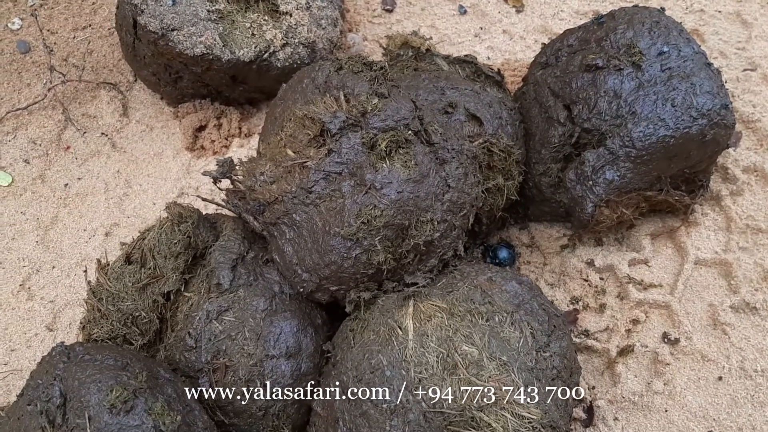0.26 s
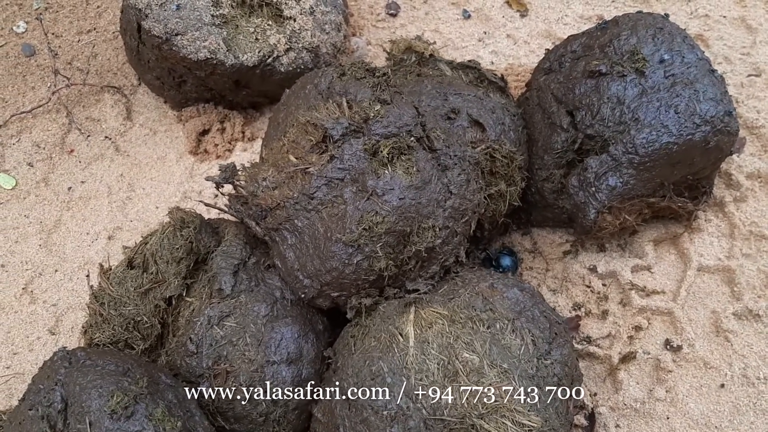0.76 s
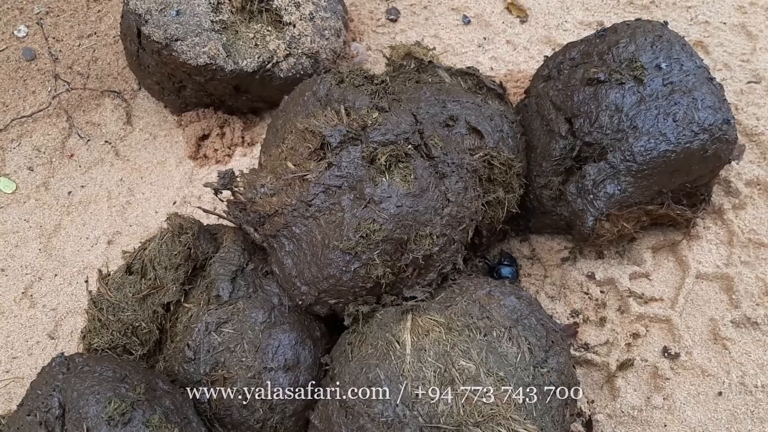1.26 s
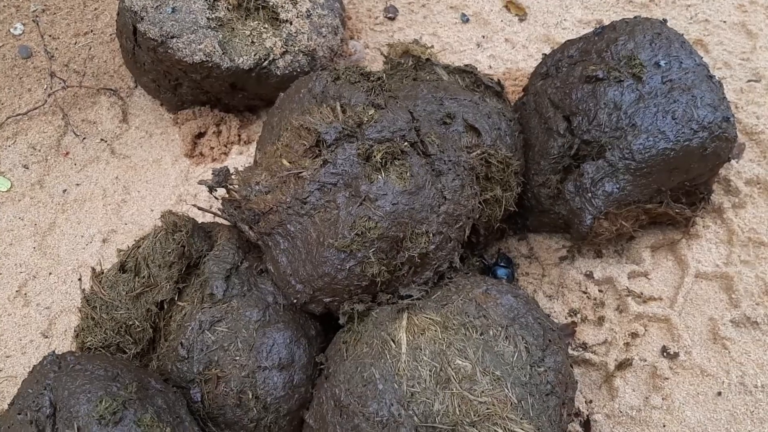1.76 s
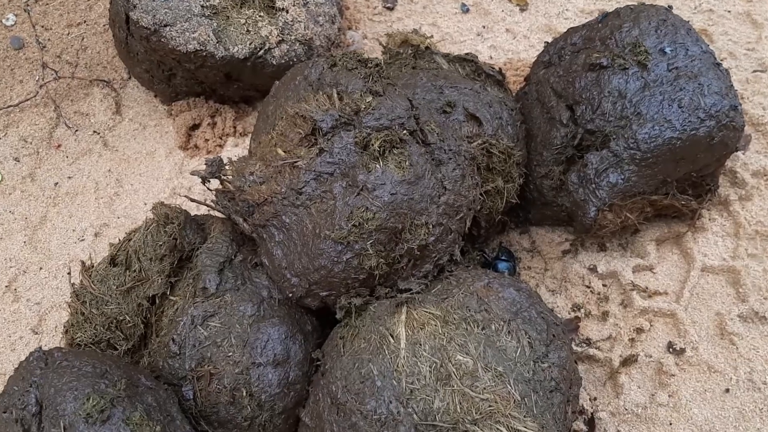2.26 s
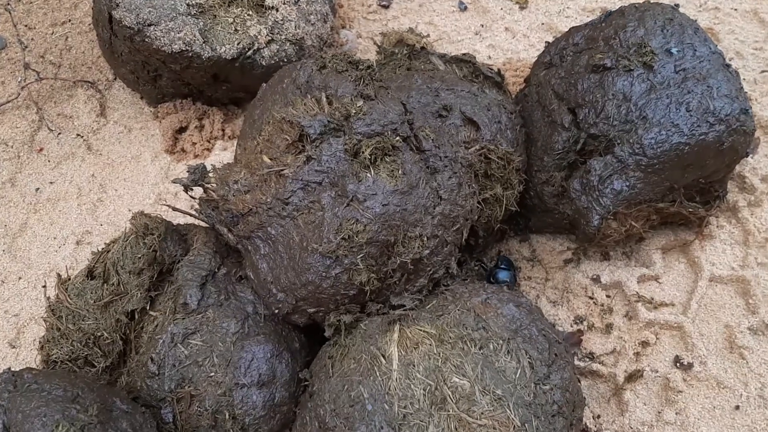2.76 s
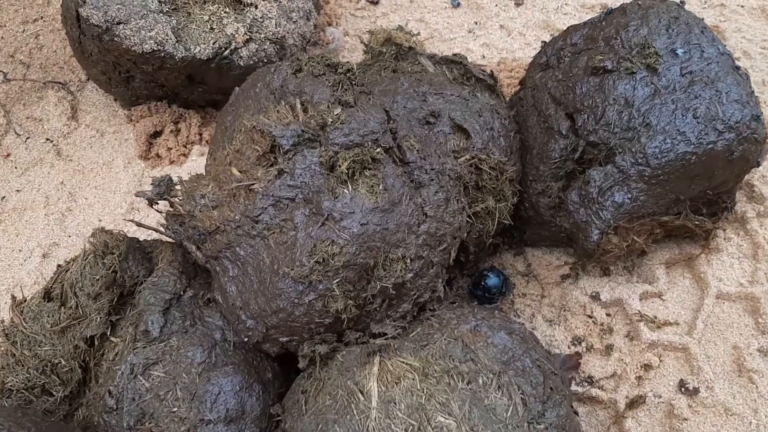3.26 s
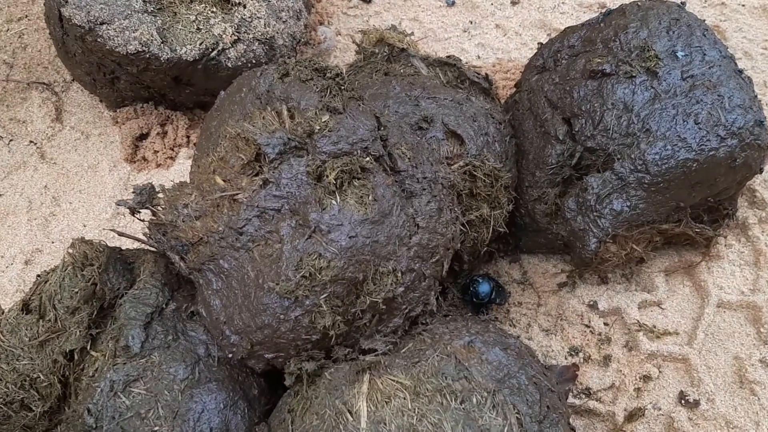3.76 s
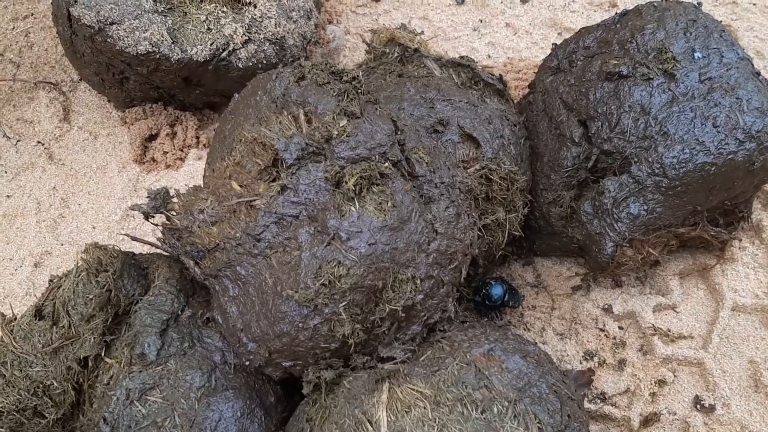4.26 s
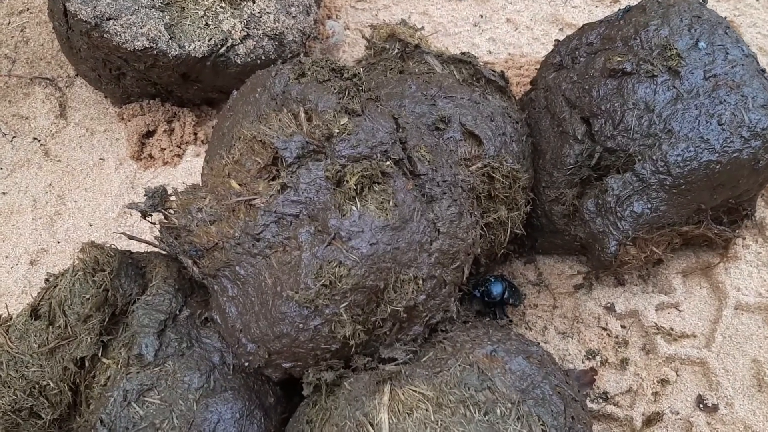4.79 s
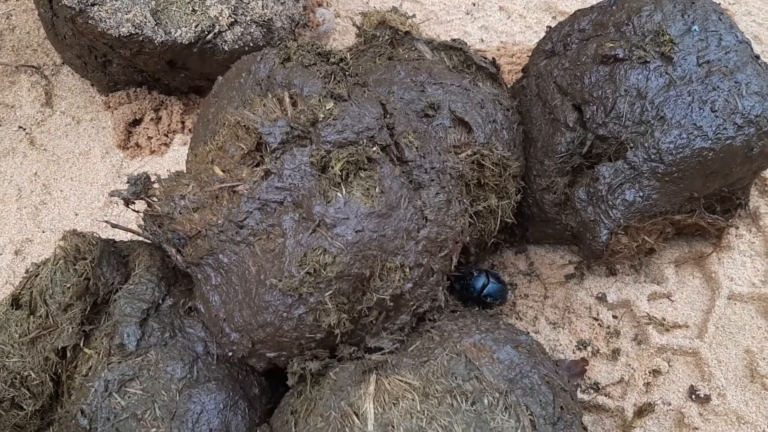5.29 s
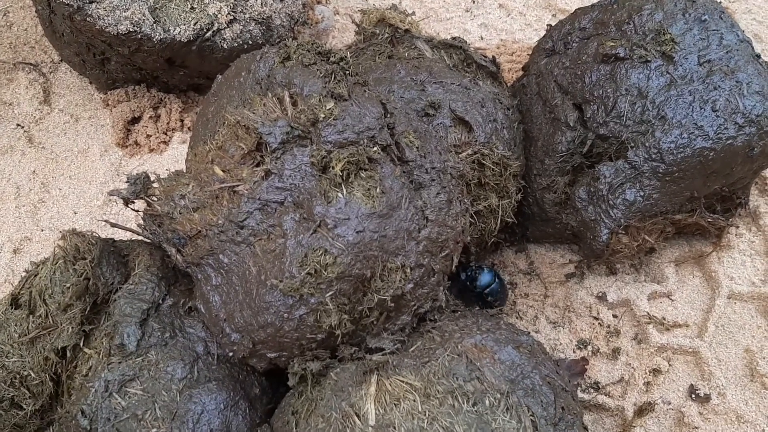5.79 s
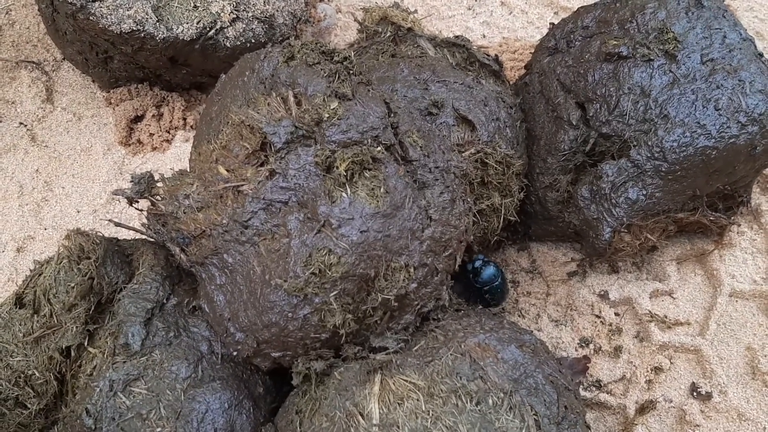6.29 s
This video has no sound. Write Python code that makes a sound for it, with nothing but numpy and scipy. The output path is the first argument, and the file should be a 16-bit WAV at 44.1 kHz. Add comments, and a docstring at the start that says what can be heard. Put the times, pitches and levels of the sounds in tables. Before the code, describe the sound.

A quiet open-air hush carries a high, shimmering insect chorus. Small birds exchange thin, echoing falling notes, with sharp ticks, quick zips and distant chirps mostly to the right. Gusts then rumble and buffet the microphone while a mewing cry sags in pitch. The wind drops away, leaving brighter whistles and a strong, close arched chirp near the end.

```python
"""Small birds in dry scrub, wind on the microphone

Two small birds deep in the bushes trade falling 'tsiu' notes over a steady band of insects. Others whistle,
tick, mew and chirp near and far: near-sine voices on drawn contours, scattered by echoes from twigs and trunks.
In the middle, gusts shake both ports of the microphone: shaped noise that throbs, rumbles, flutters and buffets.
A thin whistle wavers along with them, dry clicks snap, and a faint hush of open air lies behind it all."""
import sys
import numpy as np
from scipy import signal
from scipy.fft import rfft, irfft
from scipy.io import wavfile
from scipy.ndimage import map_coordinates

SR = 44100
rng = np.random.default_rng(int(sys.argv[2]) if len(sys.argv) > 2 else 0)


def wav_record(signal):
    """Record a signal, one row per channel, as 16-bit PCM in the file named by sys.argv[1]."""
    frames = np.transpose(np.atleast_2d(signal))
    bounded = np.clip(frames, -1, 1)
    # unit amplitude maps onto the largest positive 16-bit level
    quanta = np.round(bounded * 32767).astype(np.int16)
    wavfile.write(sys.argv[1], SR, quanta)


N = 288414
T = np.arange(N) / SR  # time, s
ALONG = np.linspace(0, 1, 65)  # share of a note's length
# Event levels are dB re full scale before the trims and panning; levels in spectra and note shapes are relative.


def undb(db):
    """Decibels to gain."""
    return 10 ** (np.asarray(db) / 20)


def unit(x):
    """Scale to rms 1."""
    return x / np.sqrt(np.mean(x ** 2))


def curves(rows, t):
    """Join the rows of a table by straight lines; the first column is time."""
    s, *columns = np.transpose(rows)
    return [np.interp(t, s, column) for column in columns]


def colour(x, points):
    """Weight the spectrum of a signal by (f/Hz, level/dB) points, joined over log frequency, at rms 1."""
    hz, db = np.transpose(points)
    f = np.maximum(np.arange(N // 2 + 1) * SR / N, 1)
    gain = undb(np.interp(np.log(f), np.log(hz), db))
    return unit(irfft(rfft(x) * gain, N))


def noise():
    """Independent white noise at the two ports."""
    return rng.standard_normal((2, N))


def walk(rate):
    """Random drift at rms 1: straight lines between `rate` chance values per second."""
    knots = rng.standard_normal(8192)
    return unit(map_coordinates(knots, [T * rate], order=1, mode="wrap"))


def pan(left_db):
    """Gains of the left and right port; left_db is the level of left over right."""
    return undb(np.array([[left_db], [-left_db]]) / 2)


def sing(notes, waver, flutter_db, second_db, third_db, nasal=0):
    """A syrinx: a near sine on each (t/s, f/Hz, level/dB) contour, with quaver and weak overtones.

    A slow second oscillation adds nasal sidebands."""
    out, quaver, flicker = np.zeros(N), walk(260), walk(110)
    for rows in notes:
        start, end = rows[0][0], rows[-1][0]
        at = slice(max(int(start * SR), 0), int(end * SR))
        hz, db = curves(rows, T[at])
        phase = 2 * np.pi * np.cumsum(hz * (1 + waver * quaver[at])) / SR
        tone = np.sin(phase) + undb(second_db) * np.sin(2 * phase)
        tone += undb(third_db) * np.sin(3 * phase) * (3 * hz < SR / 2)  # no aliasing
        beat = .094 * phase
        sidebands = np.sin(phase - beat) + 0.19 * np.sin(phase + beat) + 0.13 * np.sin(phase - 2 * beat)
        tone += nasal * sidebands
        edge = np.clip(np.minimum(T[at] - start, end - T[at]) / 0.003, 0, 1)  # 3 ms ramps against clicks
        level = undb(db + flutter_db * flicker[at])
        out[at] += np.sqrt(2) * edge * level * tone
    return out


def repeats(shape, events):
    """Contours of one note shape sung at each (t/s, level/dB, f/Hz)."""
    return [np.array(shape) * [1, hz, 1] + [s, 0, db] for s, db, hz in events]


def envelope(t, length, attack, release):
    """Level of a note in dB: it rises from -18, holds at 0 and sinks back to -18."""
    return -18 * (np.clip(1 - t / attack, 0, 1) + np.clip(1 - (length - t) / release, 0, 1))


def scrub(x, wet_db, t60, left_db):
    """Direct sound plus many small echoes from twigs and trunks, different at each port."""
    t = T[:SR]
    echoes = rng.standard_normal((2, SR)) * (rng.random((2, SR)) < .03) * (t > .002)
    echoes *= undb(-60 * t / t60) + undb(-16.5 - 60 * t / 0.56)  # near bushes, then a weaker long tail
    response = undb(wet_db) * echoes / np.sqrt(np.sum(echoes ** 2, axis=1, keepdims=True))
    response[0, 1] = response[1, 0] = 1  # the direct sound reaches the right port first
    heard = signal.fftconvolve(x[None], response, axes=1)[:, :N]
    return heard * pan(left_db) / np.sqrt(1 + undb(2 * wet_db))


# spectrum of the open air: f/Hz, level/dB
AIR_SPECTRUM = [(25, -10), (80, 2), (220, 4.5), (400, -8), (900, -17), (1800, -13.5), (2450, -5),
                (3300, -12), (6500, -15), (8500, -40.5), (11000, -15.5), (15500, -15)]


def air():
    """Faint open-air hush: shaped noise, separate at each port, whose level drifts slightly."""
    return colour(noise(), AIR_SPECTRUM) * undb(-70.0 + 0.6 * walk(4.0)) * pan(-5.0)


# spectrum of the merged insect buzz: f/Hz, level/dB
INSECT_SPECTRUM = [(3600, -31.5), (4200, -14.5), (4700, -2.5), (5200, 2), (5650, 3.5), (6100, -8.5),
                   (6800, -20.5), (7500, -67)]
# swells of the chorus: t/s at the crest, level/dB
INSECT_SWELLS = [(.3, -56.5), (.99, -54.5), (1.62, -56.5), (2.52, -54.5), (2.92, -57), (3.62, -53.5),
                 (4.55, -56.5), (5.34, -56.5), (6.2, -54)]
SWELL_S, INSECT_LULL_DB = .21, -62  # spread of a swell; level between swells


def insects():
    """Countless buzzes merge into one shimmering noise band that swells and ebbs; one thin trill stands out."""
    power = undb(INSECT_LULL_DB) ** 2
    for crest, db in INSECT_SWELLS:
        swell = undb(db) * np.exp(-.5 * ((T - crest) / SWELL_S) ** 2)
        power = power + swell ** 2
    band = colour(noise(), INSECT_SPECTRUM) * np.sqrt(power) * undb(1.5 * walk(45))
    trill_hz = 5170 + 30 * walk(120)
    trill = undb(-71.5 + 2.5 * walk(6.8)) * np.sin(2 * np.pi * np.cumsum(trill_hz) / SR)
    return (band + trill) * pan(-6.5)


def puff(start, length, attack, fall_db_per_s):
    """Strength of one puff: it builds, holds and dies away."""
    build = np.clip((T - start) / attack, 0, 1)
    return build * undb(-fall_db_per_s * np.maximum(T - start - length, 0))


# puffs of wind on the microphone: t/s, length/s, throb level/dB, rumble level/dB, flutter level/dB
GUSTS = [(0.213, 0.096, -65, -71, -87), (0.851, 0.043, -67, -62, -81), (1.09, 0.078, -63.5, -56, -86),
         (1.999, 0.36, -54, -51.5, -67), (2.274, 0.098, -49.5, -49.5, -52),
         (2.406, 0.052, -49.5, -49.5, -59.5), (2.606, 0.096, -51.5, -51, -61.5),
         (2.82, 0.16, -49.5, -45.5, -47.5), (2.995, .16, -46.5, -46, -54), (3.175, 0.096, -49, -42.5, -49),
         (3.322, 0.13, -50, -46.5, -52.5), (3.575, 0.085, -50, -46, -53), (3.974, 0.048, -55.5, -47, -64),
         (5.821, 0.15, -68.5, -56, -76)]
GUST_ATTACK_S, GUST_FALL_DB_PER_S = 0.0089, 329
THROB_ATTACK_S, THROB_FALL_DB_PER_S, THROB_HANG_S = 0.044, 71, 0.065


def gust_strengths():
    """Strength of large, small and torn eddies; the large ones build slowly, linger and die slowly."""
    large, small, torn = np.zeros((3, N))
    for start, length, throb_db, rumble_db, flutter_db in GUSTS:
        quick = puff(start, length, GUST_ATTACK_S, GUST_FALL_DB_PER_S)
        slow = puff(start, length + THROB_HANG_S, THROB_ATTACK_S, THROB_FALL_DB_PER_S)
        large = np.maximum(large, undb(throb_db) * slow)
        small = np.maximum(small, undb(rumble_db) * quick)
        torn = np.maximum(torn, undb(flutter_db) * quick)
    return large, small, torn


def ports(apart):
    """Noise shared by both ports plus a share of its own at each."""
    return rng.standard_normal(N) + apart * noise()


def lee(x):
    """The left port is sheltered from the finest eddies: above about 1 kHz the right is struck harder."""
    fine = signal.sosfilt(signal.butter(1, 1000, "high", fs=SR, output="sos"), x)
    return x + fine * (pan(-7.5) - 1)


# spectra of large, smaller and torn eddies on the microphone: f/Hz, level/dB
THROB_SPECTRUM = [(20, -25), (38, -3.5), (52, -4), (68, 3.5), (90, -4), (130, -21), (250, -86.5)]
RUMBLE_SPECTRUM = [(50, -42), (90, -6.5), (120, -0.5), (175, -3), (230, -10.5), (320, -20), (480, -24),
                   (900, -69)]
FLUTTER_SPECTRUM = [(150, -17), (300, -13.5), (430, 3), (580, 1), (750, -7.5), (1500, -11), (3000, -15),
                    (6000, -32), (9000, -39.5), (15000, -30)]
# sharp buffets: t/s, level/dB
BUFFETS = [(1.083, -60.5), (2.314, -53), (2.831, -39), (2.927, -41), (3.185, -45.5), (3.22, -45),
           (3.254, -44.5), (3.32, -39), (3.368, -37.5), (3.407, -40), (3.625, -41.5), (3.972, -48),
           (5.733, -58)]
BREEZE_DB, WAKE_DB = -74.5, -27.5  # wind between the puffs; flutter in the wake of large eddies, re their throb


def wind():
    """Eddies shake both ports: large ones throb, smaller rumble, the strongest flutter and buffet; hiss rides along."""
    large, small, torn = gust_strengths()
    breeze = undb(BREEZE_DB + 1.5 * walk(6.5))
    throb = colour(ports(0.1), THROB_SPECTRUM) * np.hypot(large, undb(0.5) * breeze)
    rumble = colour(ports(0.23), RUMBLE_SPECTRUM) * np.hypot(small, breeze)
    rumble *= undb(-1.5 + 1.395 * walk(35))
    flutter = colour(ports(0.52), FLUTTER_SPECTRUM) * np.hypot(torn, undb(WAKE_DB) * large)
    flutter *= undb(-4.5 + 2.75 * walk(120))
    hiss = colour(noise(), [(6000, -18), (9000, -4), (11000, 11), (15500, 8)])
    hiss *= large * undb(-25 + 1.8 * walk(150))
    bursts = sum(undb(db) * (T >= s) * np.exp(-np.abs(T - s) / 0.011) for s, db in BUFFETS)
    buffet_spectrum = [(100, 5.0), (500, 0), (1500, -2.0), (4000, -6.5), (9000, -28), (15000, -33)]
    buffets = colour(ports(0.99), buffet_spectrum) * bursts * undb(-5)
    return (throb + rumble + lee(flutter + buffets) + hiss) * pan(-2.7)


# one long wavering contour: t/s, f/Hz, level/dB
THIN_WHISTLE = [(1.6, 2210, -74), (1.71, 2350, -71), (1.77, 2254, -80), (2.12, 2320, -66.5),
                (2.37, 2253, -68), (2.4, 2281, -62), (2.94, 2360, -60.5), (2.97, 2396, -63),
                (3.0, 2350, -56), (3.15, 2308, -66.5), (3.47, 2266, -55), (3.64, 2259, -52),
                (3.71, 2300, -68), (4.35, 2276, -79)]


def thin_whistle():
    """A long, nearly pure tone, far to the right, that wavers and swells during the gusts."""
    tone = sing([THIN_WHISTLE], waver=0.0039, flutter_db=2.0, second_db=-43, third_db=-51)
    return tone * pan(-20) * undb(-5.0)


# faint dry clicks: t/s, level/dB
CLICKS = [(.418, -63), (1.469, -57), (1.873, -59), (4.282, -64)]
CLICK_DECAY_S = 0.0027


def clicks():
    """Tiny bright snaps, as of dry twigs: bursts of noise that start at once and decay within milliseconds."""
    snaps = sum(undb(db) * (T >= s) * np.exp(-np.abs(T - s) / CLICK_DECAY_S) for s, db in CLICKS)
    return colour(noise(), [(1000, -14), (6000, -8), (15000, -10)]) * snaps


# shapes of a chirp and of a sliding whistle: t/s from the start, pitch ratio, level/dB
CHIRP_SHAPE = [(0, .84, -11), (.016, .95, -1), (.03, 1.04, 0), (.044, 1.03, -9)]
SLIDE_SHAPE = [(0, 1.04, -9), (.06, .89, 0), (.13, .76, -2.5), (.21, .66, -6), (.29, .62, -17)]
# short arched chirps: t/s, level/dB, f/Hz
CHIRPS = [(.005, -69.5, 2320), (.135, -65.5, 2216), (0.333, -62.5, 2437), (0.366, -68, 2710),
          (.43, -67.5, 2210), (0.684, -65.5, 2390), (.74, -71, 2446), (1.196, -67, 2470),
          (1.349, -62, 2510), (1.445, -64, 2480), (1.505, -66, 2310), (2.07, -73, 2870),
          (4.555, -68.5, 2310), (4.7, -67.5, 2390), (4.79, -64.5, 3310), (5.32, -69, 2486),
          (5.467, -62.5, 2650), (5.546, -65, 3293)]
# distant sliding whistles: t/s, level/dB, start f/Hz before the shape's ratio
SLIDES = [(0.239, -74, 2183), (4.48, -71, 2148), (5.975, -68.5, 2240)]


def far_birds():
    """Rough chirps, sliding whistles and, late on, a faint random babble behind them, all to the right."""
    chirps = sing(repeats(CHIRP_SHAPE, CHIRPS), waver=0.03, flutter_db=3.5, second_db=-37, third_db=-50)
    slides = sing(repeats(SLIDE_SHAPE, SLIDES), waver=0.011, flutter_db=3.5, second_db=-7, third_db=-64)
    crowd = [(4.9 + 1.4 * a, -81.5 + 5 * b, 2600 + 750 * c) for a, b, c in rng.random((30, 3))]
    babble = sing(repeats(CHIRP_SHAPE, crowd), waver=.03, flutter_db=-8, second_db=-20, third_db=-46)
    distant = scrub(babble, wet_db=10, t60=0.45, left_db=-16)  # mostly echo
    distant += scrub(slides, wet_db=-1.5, t60=0.47, left_db=-12.5)
    return distant + scrub(chirps, wet_db=-1, t60=0.4, left_db=-17)


MEW_START_S, MEW_LENGTH_S, MEW_DB = 2.408, 0.32, -49
MEW_HZ, MEW_SAG_HZ_PER_S = 3434, 1620
MEW_SCOOP_HZ, MEW_SCOOP_S, MEW_DROOP_HZ, MEW_DROOP_S = 1396, .037, 220, .014
MEW_ATTACK_S, MEW_RELEASE_S = 0.041, 0.03
MEW_ACCENT_DB, MEW_ACCENT_AT_S, MEW_ACCENT_S = 4, 0.045, 0.017  # a push of effort as the scoop ends


def mew_contour():
    """The mew scoops up, sags evenly and droops at the end."""
    t = MEW_LENGTH_S * ALONG
    hz = MEW_HZ - MEW_SAG_HZ_PER_S * t
    hz -= MEW_SCOOP_HZ * np.exp(-(t / MEW_SCOOP_S) ** 2)
    hz -= MEW_DROOP_HZ * np.exp((t - MEW_LENGTH_S) / MEW_DROOP_S)
    accent_db = MEW_ACCENT_DB * np.exp(-((t - MEW_ACCENT_AT_S) / MEW_ACCENT_S) ** 2)
    db = MEW_DB + accent_db + envelope(t, MEW_LENGTH_S, MEW_ATTACK_S, MEW_RELEASE_S)
    return np.column_stack([MEW_START_S + t, hz, db])


# shape of a yelp: t/s from the start, pitch ratio, level/dB
YELP_SHAPE = [(0, .85, -10.5), (.01, .97, -1.5), (.02, 1.02, -3.5), (.03, 0.996, -26)]
# rising yelps after the mew: t/s, level/dB, f/Hz
YELPS = [(2.793, -45, 2970), (2.858, -56, 3190), (2.882, -47, 2820), (2.957, -55, 3080), (2.976, -52, 2780),
         (3.045, -61, 2950), (3.066, -57, 2566)]


def mew():
    """A nasal cry and its yelps, well to the right, with little echo."""
    notes = [mew_contour()] + repeats(YELP_SHAPE, YELPS)
    cry = sing(notes, waver=0.0052, flutter_db=0.2, second_db=-56, third_db=-46, nasal=0.68)
    return scrub(cry, wet_db=-7, t60=0.13, left_db=-16)


def glide(start, length, db, from_hz, to_hz):
    """Contour of a whistle that moves evenly between two pitches."""
    t = length * ALONG
    hz = from_hz + (to_hz - from_hz) * ALONG
    return np.column_stack([start + t, hz, db + envelope(t, length, attack=0.016, release=0.015)])


CALL_CREST, CALL_EDGE_DB = .64, -18  # share of the length before the top; level at both ends re the top


def arch(start, length, db, hz, rise, drop):
    """Contour of a note that swells to one crest and fades; its pitch climbs to a flat top, then falls."""
    before = np.maximum(1 - ALONG / CALL_CREST, 0)
    after = np.maximum((ALONG - CALL_CREST) / (1 - CALL_CREST), 0)
    pitch = hz * (1 - rise * before ** 2.5 - drop * after ** 2.58)
    return np.column_stack([start + length * ALONG, pitch, db + CALL_EDGE_DB * (before + after)])


# soft plain whistles: t/s, length/s, level/dB, start f/Hz, end f/Hz
SOFT_WHISTLES = [(0, 0.057, -59.5, 2720, 2596), (0.119, .09, -59.5, 4480, 4650),
                 (0.499, 0.049, -64.5, 2945, 3070), (4.702, 0.17, -68, 3370, 3470),
                 (5.139, 0.088, -51, 4420, 3850), (5.283, 0.13, -54.5, 3855, 3770),
                 (5.453, 0.094, -53.5, 3857, 3720), (5.593, 0.13, -51.5, 4026, 3760),
                 (5.908, 0.11, -53, 6370, 6310), (6.101, .11, -52, 3760, 3544),
                 (6.205, 0.051, -57, 3480, 3350), (6.268, 0.045, -48.5, 3590, 3450),
                 (6.354, 0.095, -54.5, 3513, 3410), (6.41, 0.091, -52.5, 3697, 3690),
                 (6.515, .06, -50, 4300, 4280)]
# loud arched notes of the nearest bird: t/s, length/s, level/dB, top f/Hz, share risen to the top, share dropped after
NEAR_CALLS = [(5.026, 0.061, -47, 5000, 0.013, 0.28), (5.771, .128, -32, 5183, 0.094, 0.13),
              (5.921, .048, -42, 4995, 0.0083, .01), (5.982, 0.03, -38.5, 5010, 0.011, 0.0083),
              (6.011, .016, -42, 4850, 0.036, 0.074), (6.03, .022, -36.5, 4934, 0.019, 0.15)]


def whistlers():
    """Soft plain whistles and a loud call close by."""
    soft_notes = [glide(*row) for row in SOFT_WHISTLES]
    soft = sing(soft_notes, waver=0.0068, flutter_db=4.0, second_db=-21.5, third_db=-32.0)
    call_notes = [arch(*row) for row in NEAR_CALLS]
    call = sing(call_notes, waver=0.0128, flutter_db=3, second_db=-19, third_db=-25)
    soft_placed = undb(-2) * scrub(soft, wet_db=-0.5, t60=0.54, left_db=-9.5)
    return soft_placed + undb(1.5) * scrub(call, wet_db=0.5, t60=0.28, left_db=-5.0)


# shapes of the falling note, the tick and the zip: t/s from the start, pitch ratio, level/dB
TSIU_SHAPE = [(0, 1.005, -13), (.027, .995, 1), (.042, .96, -1), (.06, .86, 2), (.085, .75, 3),
              (.113, .65, -3), (.138, .58, -9), (.16, .53, -16)]
TICK_SHAPE = [(0, 1.2, -27), (.014, 1.1, -10.5), (.03, 1.03, -8), (.048, 1, -13), (.062, .99, -6.5)]
ZIP_SHAPE = [(0, .68, -6.5), (.015, .9, 3.5), (.026, 1.08, -11), (.038, 1.1, 7)]
# 'tsiu' notes: t/s, level/dB, top f/Hz
TSIUS = [(0.221, -59, 6560), (.425, -58, 6470), (0.569, -59.5, 7020), (.745, -59, 6560),
         (0.889, -61.5, 7130), (1.09, -57.5, 6690), (1.249, -61.5, 6990), (1.45, -58.5, 6670),
         (1.59, -60.5, 7040), (1.804, -55.5, 6754), (1.94, -59, 7070), (2.154, -56, 6630),
         (2.293, -56.5, 6910), (2.578, -53.5, 6600), (2.931, -56, 6700), (3.369, -58, 6480),
         (3.708, -59, 6710), (4.096, -60, 6580), (4.346, -57, 7140), (4.445, -58, 6630), (4.67, -60, 7080),
         (4.818, -55, 6545)]
# sharp high ticks: t/s, level/dB, end f/Hz
TICKS = [(.85, -51, 4410), (1.874, -44.5, 7190), (3.004, -41.5, 7060), (3.116, -41, 6990),
         (4.498, -48.5, 6950), (5.601, -54.5, 6920)]
# quick upward zips: t/s, level/dB, middle f/Hz
ZIPS = [(0.863, -48, 6135), (2.964, -47.5, 6760), (3.087, -47.5, 7000), (3.59, -49.5, 6400)]


def small_birds():
    """High falling notes and zips from deep in the bushes, mostly echo, and nearer ticks."""
    tsiu = sing(repeats(TSIU_SHAPE, TSIUS), waver=.014, flutter_db=2.5, second_db=-52, third_db=-55)
    ticks = sing(repeats(TICK_SHAPE, TICKS), waver=0.015, flutter_db=1, second_db=-41, third_db=-55)
    zips = sing(repeats(ZIP_SHAPE, ZIPS), waver=0.0258, flutter_db=3.0, second_db=-31, third_db=-57)
    hidden = scrub(tsiu, wet_db=6, t60=0.25, left_db=-8.5)
    hidden += scrub(zips, wet_db=7, t60=0.24, left_db=-7.5)
    return undb(-1.0) * hidden + scrub(ticks, wet_db=1, t60=0.2, left_db=-5.0)


def scene():
    """All the sources together, from the open air to the birds in the bushes."""
    background = air() + insects() + wind() + thin_whistle() + clicks()
    return background + far_birds() + mew() + whistlers() + small_birds()


LOW_CUT_HZ, TOP_HZ = 44.6, 15750


def record(dry):
    """The recorder cuts the deepest bass and the top."""
    thinned = signal.sosfilt(signal.butter(4, LOW_CUT_HZ, "high", fs=SR, output="sos"), dry)
    return signal.sosfilt(signal.ellip(10, .2, 80, TOP_HZ, fs=SR, output="sos"), thinned)


dry = scene()
out = record(dry)
wav_record(out)
```